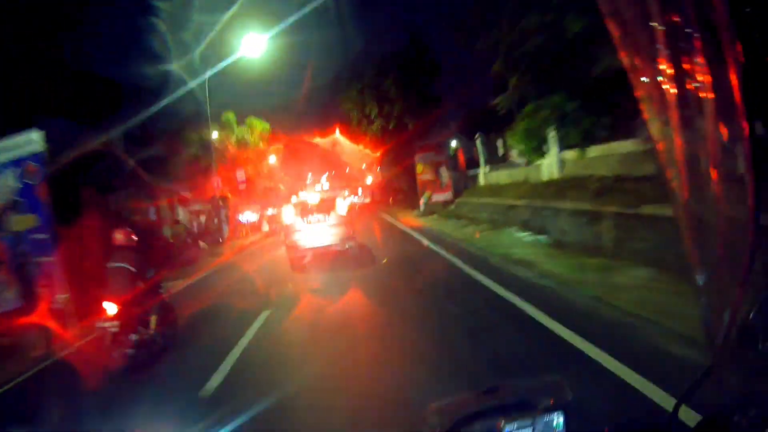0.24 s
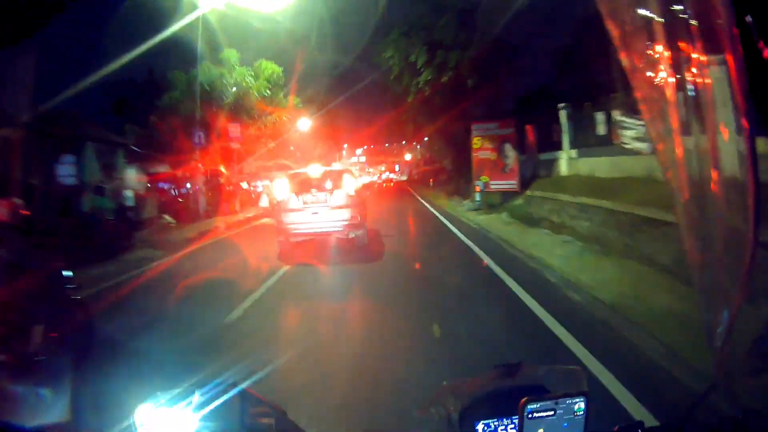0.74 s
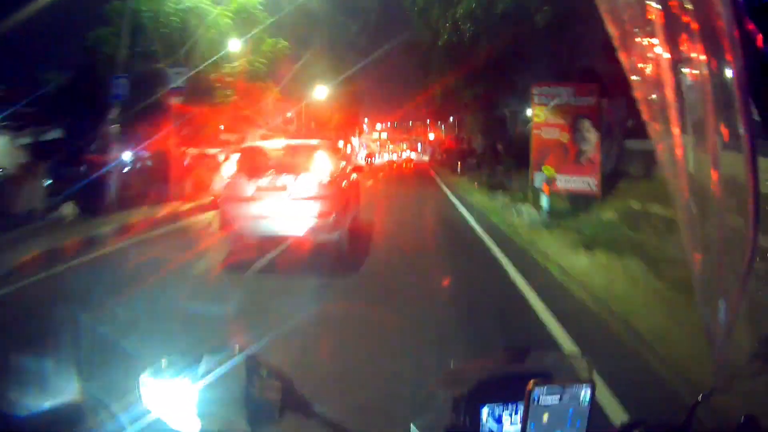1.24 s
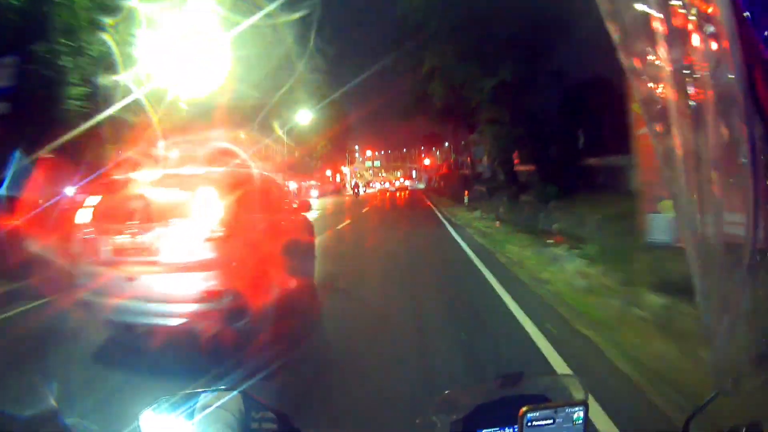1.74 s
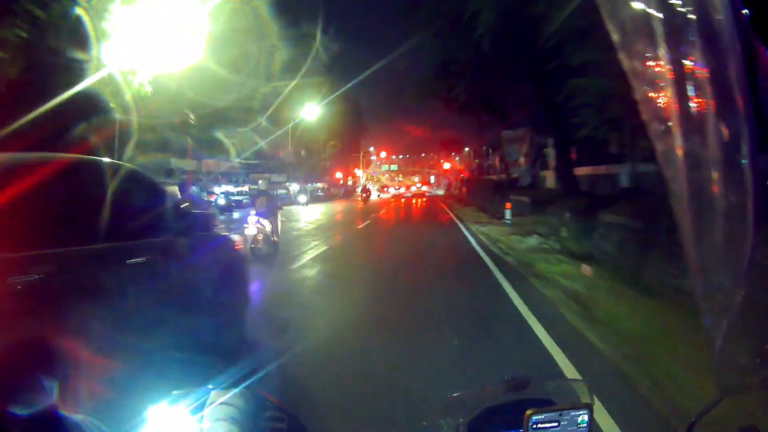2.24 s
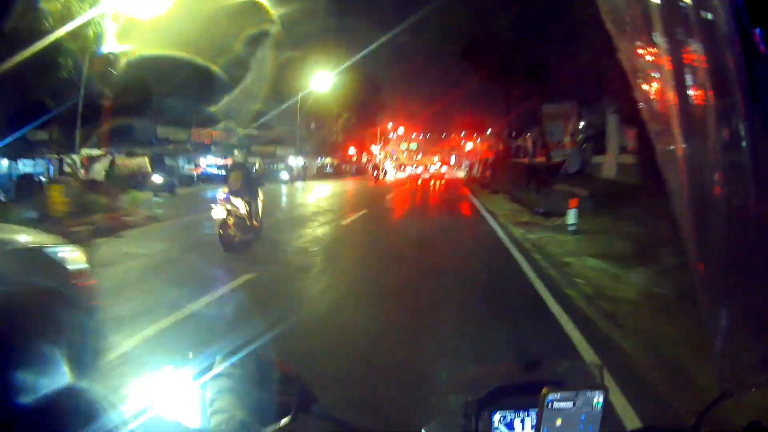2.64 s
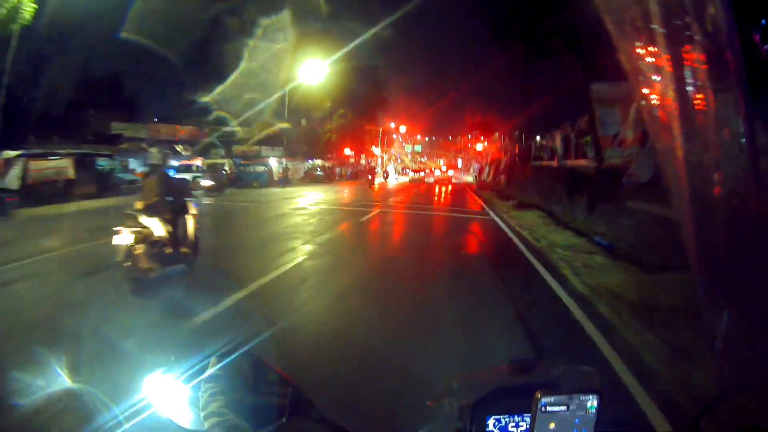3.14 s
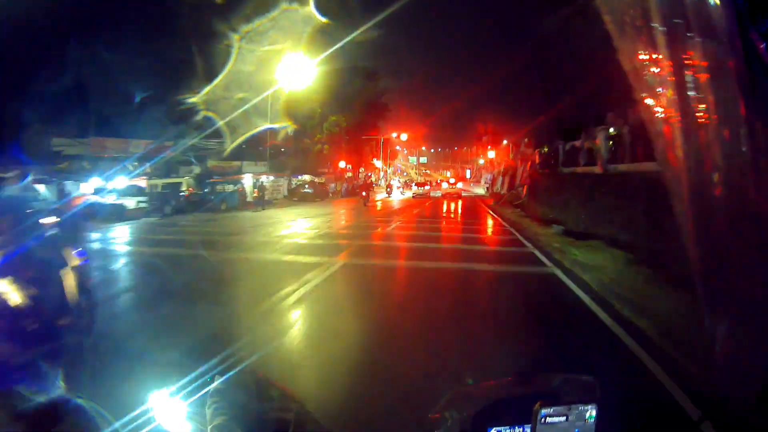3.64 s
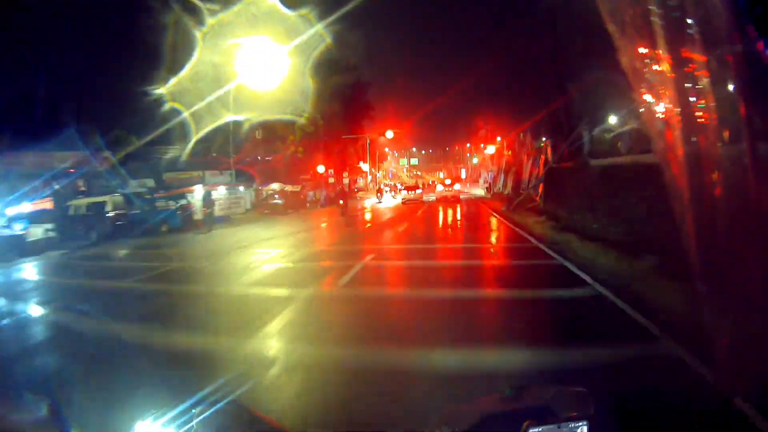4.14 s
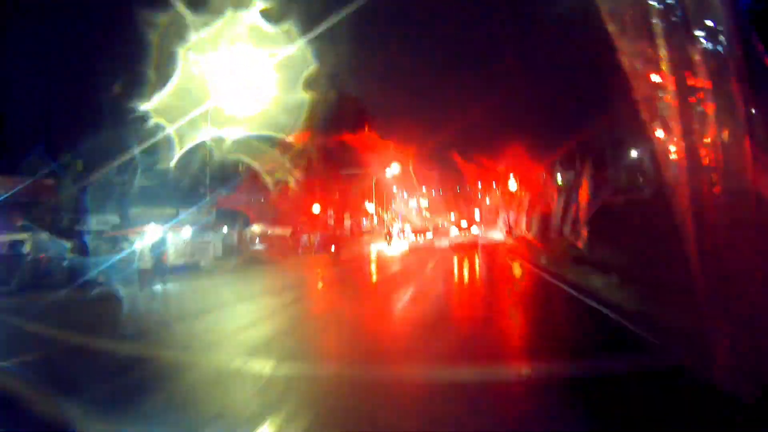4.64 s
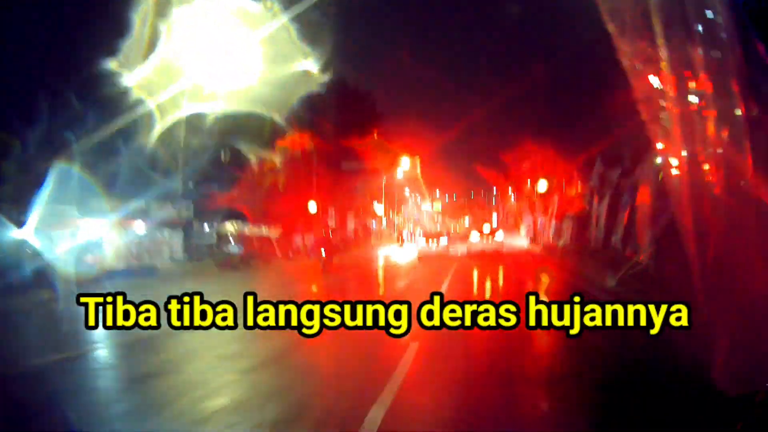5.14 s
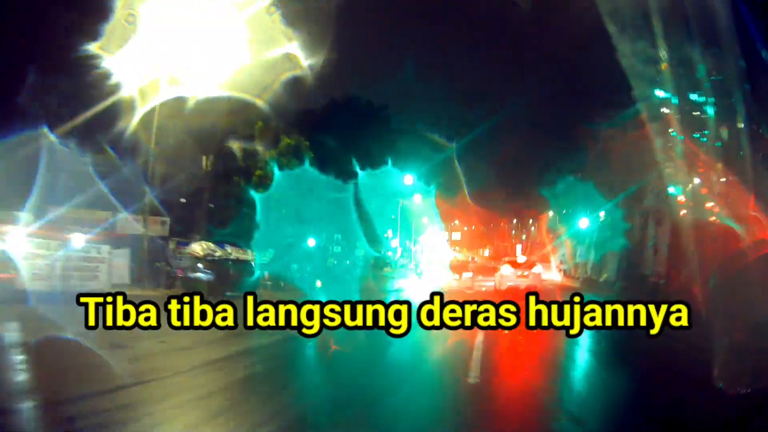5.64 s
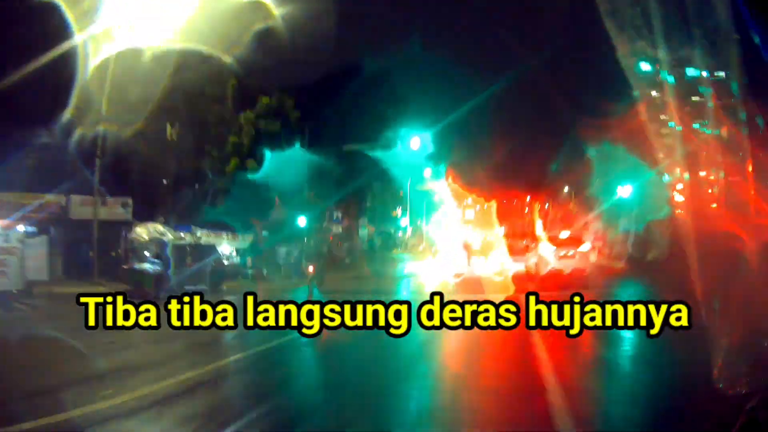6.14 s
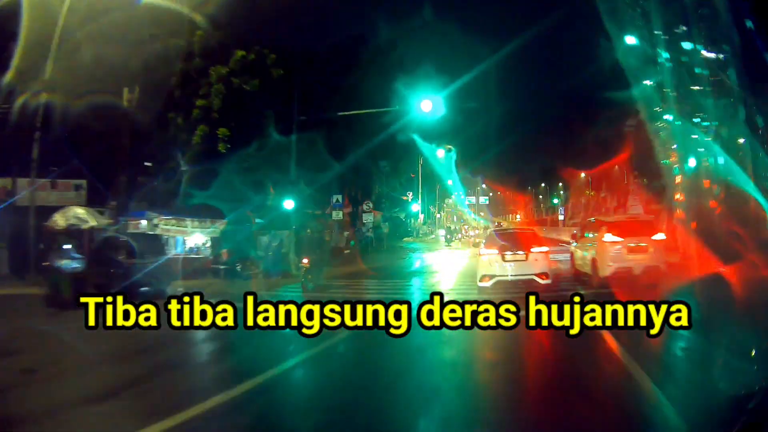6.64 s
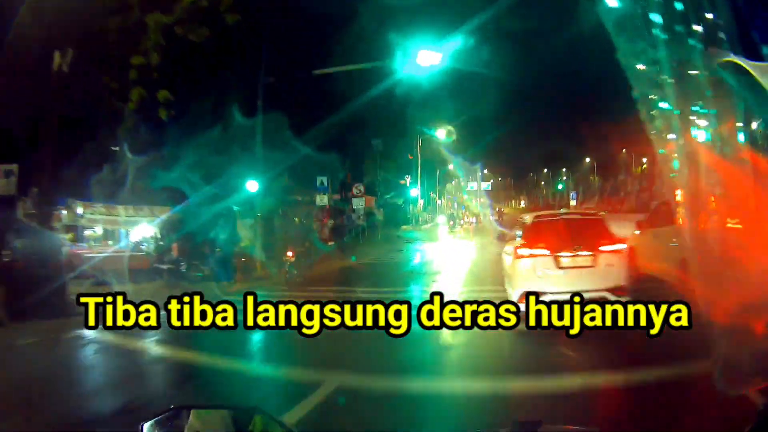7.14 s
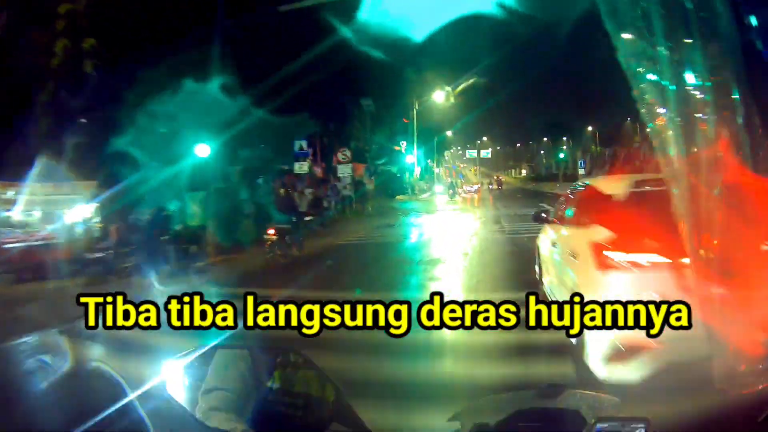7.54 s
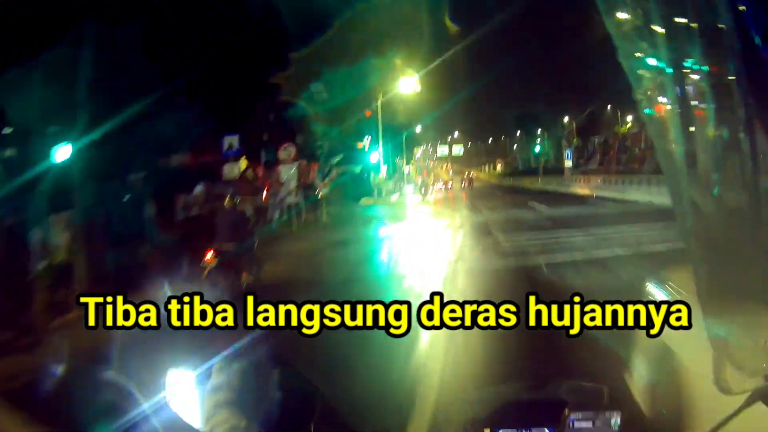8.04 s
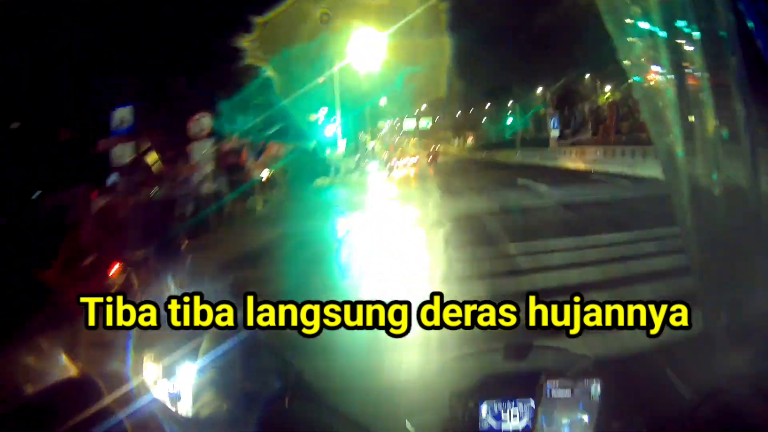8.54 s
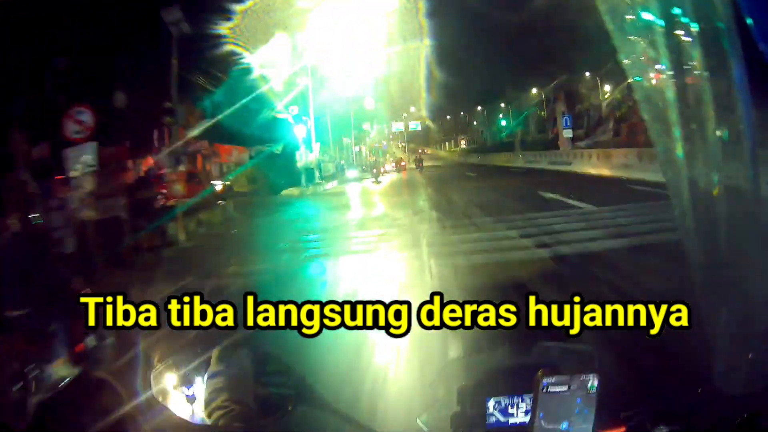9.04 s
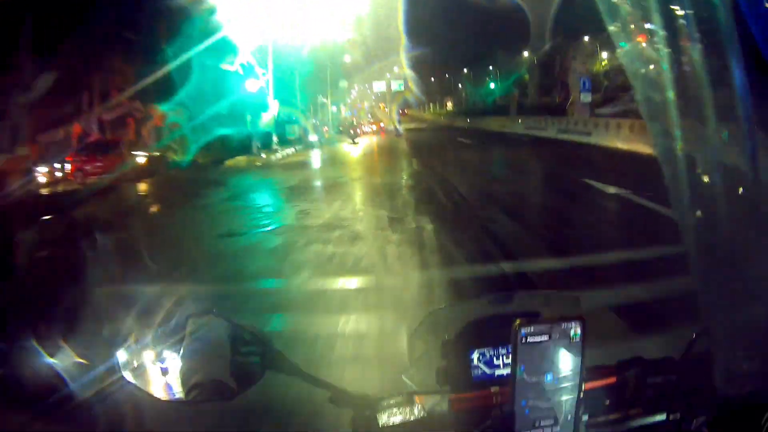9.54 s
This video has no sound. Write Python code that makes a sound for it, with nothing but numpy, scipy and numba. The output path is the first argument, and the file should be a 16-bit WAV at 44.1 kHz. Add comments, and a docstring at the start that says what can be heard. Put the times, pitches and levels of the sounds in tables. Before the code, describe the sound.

Wind buffets and rumbles hard against a microphone on a small motorcycle in heavy rain, with pattering drops, engine drone and buzzing road ribs.

```python
"""On a road in heavy rain, aboard a small motorcycle: the microphone sits in a camera on the rider.
Closest is wind on the microphone port, filtered noise in eddy sizes with thumps and whooshes, up to overload.
Rain is hiss and drops ringing the camera case and fairing; wet plastic squeaks in short noise tones.
Below, the single-cylinder engine drones as sines and ribs in the road hum and knock.
Vehicles alongside roar as band-passed noise; air whistles in gaps as wavering tones with breath."""
import sys
import numpy as np
from scipy import signal
from scipy.fft import rfft, irfft, next_fast_len
from scipy.io import wavfile
from scipy.ndimage import uniform_filter1d
from numba import njit

SR = 44100
rng = np.random.default_rng(int(sys.argv[2]) if len(sys.argv) > 2 else 0)


def transcribe(u):
    """Save the signal u as a 16-bit wav file named by the first command-line argument.

    u: samples, shape (n,) or (channels, n), limited to [-1, 1]; the rate is SR.
    q: integer samples, one column per channel.
    """
    v = np.clip(np.atleast_2d(u).T, -1, 1)
    q = np.round(v * 32767).astype(np.int16)
    wavfile.write(sys.argv[1], SR, q)


N = 431298  # samples


def undb(db):
    """Turn dB into gain."""
    return 10 ** (np.asarray(db) / 20)


def unit(x):
    """Scale to rms 1."""
    return x / np.sqrt(np.mean(x ** 2))


def curves(table):
    """Columns of a table at every sample; the last, in dB, falls silent outside the table's span."""
    times, *columns = np.transpose(table)
    t = np.arange(N) / SR
    out = [np.interp(t, times, column) for column in columns]
    outside = np.maximum(times[0] - t, 0) + np.maximum(t - times[-1], 0)
    out[-1] = out[-1] - 400 * outside  # dB per second
    return out


@njit
def moving_band(x, hz, width):
    """State-variable band-pass with a moving centre, gain 1 there."""
    y, band_state, low_state = np.empty(len(x)), 0., 0.
    for i in range(len(x)):
        g, damping = 3.14159265 * hz[i] / SR, width / hz[i]
        g = g + g ** 3 / 3  # approximates tan(g)
        v = (band_state + g * (x[i] - low_state)) / (1 + g * (g + damping))
        band_state = 2 * v - band_state
        low_state = low_state + 2 * g * v
        y[i] = damping * v
    return y


def band(x, hz, width):
    """Band-pass with a fixed centre."""
    return moving_band(x, np.full(N, 1. * hz), 1. * width)


def narrow_noise(hz, width):
    """Noise through two equal band-passes that follow a moving centre."""
    once = moving_band(rng.standard_normal(len(hz)), hz, 1. * width)
    return moving_band(once, hz, 1. * width)


def walk(rate):
    """Random levels, about rate a second, joined smoothly; spread near 1."""
    levels = rng.standard_normal(int(N / SR * rate) + 3)
    points = uniform_filter1d(np.repeat(levels, 4), 4)
    return 1.25 * np.interp(np.arange(N) * 4 * rate / SR, np.arange(len(points)), points)


def log_bins(size):
    """Log frequency of each bin of a real transform."""
    return np.log(np.arange(size // 2 + 1) * SR / size + 1e-3)


def colour(x, points):
    """Shape a signal by a (frequency, level) spectrum, steeply closed outside it."""
    hz, db = np.transpose(points)
    size = next_fast_len(N)
    gain_db = np.interp(log_bins(size), np.log(hz), db, left=-90, right=-90)
    return irfft(rfft(x, size) * undb(gain_db), size)[:N]


def ring(hits, modes):
    """Short rings at a set of modes, alternating in sign."""
    return sum((-1) ** k * undb(db) * band(hits, hz, width) for k, (hz, width, db) in enumerate(modes))


def arch_over(length_s):
    """Half a sine that rises and falls over a length in seconds."""
    return np.sin(np.linspace(0, np.pi, int(length_s * SR)))


# Irregular drift of the wind at the port; only the swings about each mean are used:
# (time [s], buffet level [dB], rumble level [dB], fine-eddy level [dB])
WIND_LEVELS = [(0, -24.5, -25.5, -41), (.45, -25.5, -26, -34.5), (.8, -25, -23, -39.5),
               (1.2, -25.5, -23, -39), (1.7, -21.5, -27, -37), (2.45, -19, -28, -35),
               (2.8, -26, -24.5, -34), (3.5, -24.5, -20, -38), (3.96, -26, -23, -37.5),
               (4.02, -23.5, -26, -28), (4.3, -29, -25, -32), (4.75, -27.5, -24, -38.5),
               (5.1, -22.5, -24, -38), (5.8, -24, -24, -32), (6.15, -29.5, -24, -39.5),
               (7.3, -26, -23, -40.5), (7.76, -21, -26, -29), (8.45, -21.5, -23.5, -37),
               (8.9, -26, -18.5, -38), (9.4, -20, -27.5, -36), (9.78, -21, -18, -31.5)]
# Spectrum of the wind: (frequency [Hz], relative level [dB per Hz])
WIND_SPECTRUM = [(11, -34.5), (18, 2.5), (43, -1), (75, -3.5), (163, -6), (503, -24), (624, -32),
                 (846, -35.5), (1170, -41), (1690, -76)]
# How far each eddy size follows those levels: (frequency [Hz], buffet share, rumble share, fine-eddy share)
EDDY_SHARES = [(22, 0.92, 0.23, 0.14), (45, 0.94, 0.013, 0.34), (80.6, 0.52, 0.87, 0.03),
               (133, 0.21, 0.92, 0.067), (220, 0.011, 0.31, 0.48), (402, 0.043, 0.32, 0.96),
               (620, 0.017, 0.48, 1.2), (910, 0.5, 0, 0.87), (1300, 0.07, 0, 0.94)]
FLICKER_DB, FINE_FLICKER_DB, FINE_FROM_HZ = 2.5, 1.56, 500  # small eddies flicker less


def wind():
    """Eddies pass the port in lumps, each size flickering alone; levels drift, fine eddies also rise in gusts."""
    levels = np.array(curves(WIND_LEVELS))
    swing = levels - levels.mean(axis=1, keepdims=True)
    size = next_fast_len(N)
    air = rfft(colour(rng.standard_normal(N), WIND_SPECTRUM), size)
    lumps = walk(13)  # shared by all sizes
    hz, *follow = np.transpose(EDDY_SHARES)
    flicker_db = np.where(hz < FINE_FROM_HZ, FLICKER_DB, FINE_FLICKER_DB)
    out = 0
    for own, share, db in zip(np.eye(len(hz)), np.transpose(follow), flicker_db):
        # neighbouring sizes overlap and sum to the whole
        eddy = irfft(air * np.interp(log_bins(size), np.log(hz), own), size)[:N]
        out = out + eddy * undb(share @ swing + 1.27 * lumps + db * walk(16))
    return unit(out) * undb(-19.5)


# Sharp buffets that thump the port: (time [s], envelope peak [dB], pitch [Hz])
PORT_THUMPS = [(0.385, -16, 108), (0.454, -10.5, 143), (0.515, -10.5, 141), (0.554, -12.5, 114),
               (0.737, -18.5, 151), (2.241, -9.5, 180), (3.179, -15, 194), (4.973, -15, 108),
               (5.592, -15, 167)]
THUMP_RISE_S, THUMP_FALL_S = 0.0024, 0.0097  # time constants


def thumps():
    """A few cycles of low pressure swing, quick to come and to go."""
    out = np.zeros(N)
    t = np.arange(3000) / SR
    shape = (1 - np.exp(-t / THUMP_RISE_S)) * np.exp(-t / THUMP_FALL_S)
    for s, db, hz in PORT_THUMPS:
        at = int(s * SR)
        out[at:at + 3000] -= undb(db) * shape / shape.max() * np.sin(2 * np.pi * hz * t)
    return out


# Gusts that rise and fall in pitch; the centre moves from 0.3 to 0.63 of the pitch scale and back:
# (time [s], length [s], pitch scale [Hz], level before the swell [dB])
GUST_WHOOSHES = [(1.632, 0.24, 597, -31.5), (3.118, 0.25, 580, -28), (4.42, 0.31, 770, -29.5)]


def whooshes():
    """A band of fine eddies that climbs as the gust peaks."""
    out = np.zeros(N)
    for s, length, scale_hz, db in GUST_WHOOSHES:
        arch = arch_over(length)
        air = narrow_noise(scale_hz * (0.3 + 0.33 * arch), 320)
        swell = np.minimum(1.53 * arch, 1)
        at = int(s * SR)
        out[at:at + len(air)] += unit(air) * swell * undb(db)
    return out


# Spectrum of the rain hiss: (frequency [Hz], relative level [dB per Hz])
RAIN_SPECTRUM = [(410, -33.5), (838, 1), (1170, -7.5), (1380, 0), (1810, -8), (2620, -8), (3510, -14.5),
                 (4330, -9.5), (6460, -16.5), (7660, -31), (9960, -65)]
# Modes of the camera case, low to high: (frequency [Hz], width [Hz], relative level [dB])
CASE_MODES = [(1514, 220, 0.5), (1950, 70, 1), (2620, 490, -6), (4250, 320, 9), (6040, 1290, 1.5)]
# Big drops on the case, before its ringing: (time [s], relative peak [dB], treble relative to it [dB])
BIG_DROPS = [(0.11, -24, -10), (0.548, -21.5, -10), (2.233, -26, -8), (2.389, -19, -13), (2.4586, -26, -2),
             (2.473, -24, -14), (2.9348, -29, -3), (4.005, -19, -12), (4.1021, -35, 0), (4.882, -27, -9),
             (5.36, -23, -14), (5.5316, -23.5, -11), (5.802, -20, -11), (5.906, -32, -1), (6.295, -26, -13),
             (6.3237, -19, -15), (6.352, -24, -20), (6.378, -23, -19), (6.4289, -19.5, -14),
             (6.5624, -25, -9), (6.763, -19.5, -24), (6.773, -19.5, -24), (6.92, -28, -12),
             (7.336, -29, -9), (7.563, -27, -22), (9.2883, -27.5, -2.5), (9.642, -25, 1.5)]


def patter(per_s, spread_db):
    """Drops at random moments, some larger than the rest, pushing either way."""
    chance = rng.random((N, 3))
    excess = np.minimum(-np.log(1 - chance[:, 1]), 4)
    sign = np.sign(chance[:, 2] - .5)
    return (chance[:, 0] < per_s / SR) * undb(spread_db * excess) * sign


def big_drops():
    """Each big drop thuds on the low case modes and ticks in the treble."""
    thud, tick = np.zeros(N), np.zeros(N)
    after = np.arange(400) / SR
    splash = rng.standard_normal((len(BIG_DROPS), 400)) * np.exp(-after / .004)
    push = np.sin(np.pi * np.clip(after / 0.00024, 0, 1))  # a drop flattens in a fraction of a millisecond
    for (s, peak_db, treble_db), burst in zip(BIG_DROPS, splash):
        at = int(s * SR)
        thud[at:at + 400] += undb(peak_db) * (.7 * push + .3 * burst)
        tick[at:at + 400] += undb(peak_db + treble_db) * (np.exp(-after / .00003) + 0.46 * burst)
    return undb(10.5) * ring(thud, CASE_MODES[:3]) + undb(9.5) * band(tick, 4300, 2700)


def rain():
    """Road spray hisses steadily; rain hiss and patter on the case come in flurries, with big drops on top."""
    db = sheets()
    flurry = walk(22)
    hiss = unit(colour(rng.standard_normal(N), RAIN_SPECTRUM))
    hiss = hiss * (undb(-61.0) + undb(db - 2.5 + 1.5 * flurry))  # steady spray, then varying rain
    # heavy drops reach the low modes, small ones only the high
    heavy = ring(patter(300 * undb(4.4 * flurry), spread_db=5.5), CASE_MODES[:3])
    small = ring(patter(500 * undb(5.1 * flurry), spread_db=6.5), CASE_MODES[2:])
    drops = unit(heavy) * undb(-7.5) + unit(small) * undb(-8.5)
    return hiss + drops * undb(db) + big_drops()


# Slowly changing rain, the reference for hiss and patter: (time [s], reference level [dB])
RAIN_LEVEL = [(0, -41), (.55, -52), (.66, -48.5), (1.3, -46.5), (2.6, -49), (3.2, -46), (4.8, -49),
              (6.4, -44.5), (7.3, -49), (8.8, -47.5), (9.1, -43), (9.78, -44)]
# Sheets of rain blown against the camera: (time [s], length [s], reference level [dB])
RAIN_SHEETS = [(0.081, 0.043, -36.5), (0.226, 0.11, -40), (0.405, 0.15, -41), (0.784, 0.2, -44),
               (1.949, 0.11, -44), (2.125, 0.14, -45.5), (2.355, 0.12, -40), (3.96, 0.26, -45),
               (5.558, 0.43, -46.5), (5.819, 0.12, -40), (7.544, 0.059, -43.5), (7.793, 0.63, -40.5),
               (8.56, 0.075, -42), (9.611, 0.074, -39)]
SHEET_RISE_S, SHEET_FALL_S = 0.017, 0.046


def sheets():
    """Level in dB of the slowly changing rain with the sheets added: quick rise, hold, fading fall."""
    t = np.arange(N) / SR
    power = undb(2 * curves(RAIN_LEVEL)[0])
    for s, length, db in RAIN_SHEETS:
        rise = np.clip((t - s) / SHEET_RISE_S, 0, 1)
        fall = np.exp(-np.maximum(t - s - length, 0) / SHEET_FALL_S)
        power = power + (undb(db) * rise * fall) ** 2
    return 10 * np.log10(power)


# Short squeaks of wet plastic: (time [s], pitch [Hz], level before the arch [dB], length [s])
PLASTIC_SQUEAKS = [(0.256, 1400, -40, 0.044), (3.954, 1900, -39, 0.029), (4.239, 5800, -50, 0.066),
                   (8.187, 1510, -33, 0.056)]


def squeaks():
    """Wet plastic rubs in brief breathy tones: narrow noise under an arch."""
    out = np.zeros(N)
    for s, hz, db, length in PLASTIC_SQUEAKS:
        arch = arch_over(length)
        rub = moving_band(rng.standard_normal(8000), np.full(8000, 1. * hz), min(.07 * hz, 200.))
        rub = rub[-len(arch):]  # the filter has settled by then
        at = int(s * SR)
        out[at:at + len(arch)] += undb(db) * arch * unit(rub)
    return out


# Engine below the rider, cruising and then rolling off the throttle:
# (time [s], firing rate [Hz], level [dB])
ENGINE_RUN = [(0, 37.2, -35), (2.9, 35.7, -31), (5.3, 35.1, -31), (5.83, 36.2, -25), (6.05, 34, -24),
              (6.94, 30.8, -21), (7.35, 29.4, -28), (7.7, 28.5, -40)]
# Exhaust tones: (multiple of the firing rate, relative level [dB])
EXHAUST_TONES = [(2, -4), (3, -2), (4, 0), (5, 0), (6, -13)]


def engine():
    """Steady firings through the exhaust give clean low multiples."""
    hz, db = curves(ENGINE_RUN)
    turn = 2 * np.pi * np.cumsum(hz * (1 + .002 * walk(10))) / SR
    tones = sum(undb(g + 1.4 * walk(2.1)) * np.sin(k * turn + k * k) for k, g in EXHAUST_TONES)
    return unit(tones) * undb(db)


# Tyres over two stretches of ribs in the road; the knock is capped at the thump setting:
# (time [s], rib rate [Hz], knock setting [dB], thump setting [dB])
RIB_STRETCHES = [
    [(3.99, 81, -38, -41), (4.03, 81.7, -29, -27), (4.09, 81, -32, -16.5), (4.2, 80, -34, -20),
     (4.36, 71, -43, -19), (4.45, 70, -49, -28)],
    [(7.45, 77.9, -41.5, -24), (7.8, 80.33, -37, -24), (8.2, 82.87, -34.5, -22), (8.6, 86.8, -51.5, -28.5),
     (9.2, 88.5, -43, -40)],
]
# Panels that a rib knocks on: (frequency [Hz], width [Hz], relative level [dB])
PANEL_MODES = [(367, 250, 6), (950, 800, -3.5)]


def ribs():
    """Each rib thumps the frame and gives the panels a short sharp knock."""
    out = 0
    for table in RIB_STRETCHES:
        hz, knock_db, db = curves(table)
        turn = np.cumsum(hz * (1 + .011 * walk(30))) / SR  # ribs passed
        thump = np.sin(2 * np.pi * turn) + 0.28 * np.sin(np.pi * turn) + 0.13 * np.sin(3 * np.pi * turn)
        decay = np.exp(-(turn % 1) / .03)  # starts afresh at each rib
        blow = decay * undb(3.5 * walk(80)) * (1 + rng.standard_normal(N))
        knock = sum(undb(g) * band(band(blow, f, w), f, w) for f, w, g in PANEL_MODES)
        out = out + undb(db) * thump - unit(knock) * undb(np.minimum(knock_db, db))
    return out


# Wet tyres of vehicles alongside, two passages; both levels waver:
# (time [s], ringing gap level [dB], roar level [dB])
CAR_PASSAGES = [
    [(.25, -60, -54), (.5, -46, -43), (.65, -57, -49.5)],
    [(7.3, -54, -60), (7.45, -52, -46), (7.9, -50.5, -44.5), (8.15, -45, -42), (8.33, -41, -43.5),
     (8.48, -44.5, -47), (8.6, -58, -45.5), (8.7, -60, -60)],
]
# Bands of the tyre roar: (frequency [Hz], width [Hz], relative level [dB])
ROAR_BANDS = [(880, 200, -1.5), (1140, 1320, -8.5)]
CAR_GAP_HZ, CAR_GAP_WIDTH_HZ = 1490, 200


def cars():
    """Tyres roar, and the gap between the vehicles rings at a wavering note."""
    out = 0
    for table in CAR_PASSAGES:
        gap_db = curves([row[:2] for row in table])[0]  # alone, so it also falls silent outside
        roar_db = curves(table)[1]
        note = narrow_noise(CAR_GAP_HZ * (1 + 0.025 * walk(9)), CAR_GAP_WIDTH_HZ)
        roar = ring(rng.standard_normal(N), ROAR_BANDS)
        out = out + unit(roar) * undb(roar_db + 1.6 * walk(26))
        out = out + unit(note) * undb(gap_db + 1.5 * walk(26))
    return out


# Air whistling in two gaps, a thin whine that sags and a broader whistle; pitch and level waver:
# (time [s], pitch [Hz], level [dB])
GAP_WHISTLES = [
    [(.7, 2830, -66), (.84, 2770, -57), (.98, 2670, -62), (1.3, 2640, -55), (1.56, 2625, -50),
     (1.62, 2615, -60), (1.78, 2600, -54), (1.95, 2600, -62), (2.45, 2640, -61), (2.85, 2605, -58),
     (3.2, 2530, -63)],
    [(3.62, 4230, -58), (3.7, 4180, -53), (3.83, 4230, -52), (3.89, 4210, -62), (3.98, 4220, -49),
     (4.12, 4130, -48), (4.22, 4250, -57), (4.28, 4080, -53), (4.4, 4250, -60)],
]
# One row for each gap: (breath width [Hz], flutter [dB])
GAP_BREATHS = [(60, 1), (260, 2)]
WHISTLE_WAVER = 0.004  # share of the pitch


def whistles():
    """Air in gaps sounds narrow tones, part steady and part breath, that waver and flutter."""
    out = 0
    for table, (width, flutter_db) in zip(GAP_WHISTLES, GAP_BREATHS):
        hz, db = curves(table)
        pitch = hz * (1 + WHISTLE_WAVER * walk(7.4))
        breath = narrow_noise(pitch, width)
        tone = np.sin(2 * np.pi * np.cumsum(pitch) / SR)
        mix = unit(breath) + 75 / width * tone  # a narrower gap sounds purer
        out = out + unit(mix) * undb(db + flutter_db * walk(30))
    return out


def scene():
    """All sources at one microphone."""
    at_port = wind() + thumps() + whooshes()
    on_case = rain() + squeaks()
    return (at_port + on_case + engine() + ribs() + cars() + whistles())[None]


FULL_SCALE, KNEE = .362, 8.0  # overload ceiling, sharpness of its bend
TOP_HZ = 7600


def record(dry):
    """The input rounds into overload, which also wipes the fine sound at the peaks; then the top is cut."""
    clipped = dry / (1 + np.abs(dry / FULL_SCALE) ** KNEE) ** (1 / KNEE)
    soft = signal.sosfilt(signal.butter(4, 7000, fs=SR, output="sos"), clipped)
    return signal.sosfilt(signal.ellip(8, .2, 60, TOP_HZ, fs=SR, output="sos"), soft)


dry = scene()
out = record(dry)
transcribe(out)
```